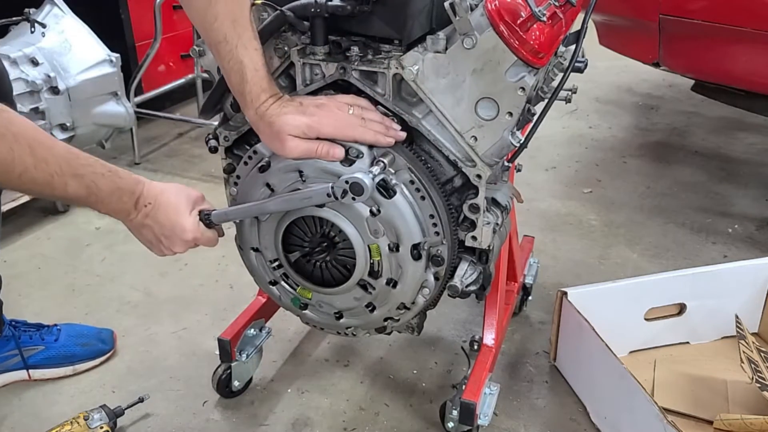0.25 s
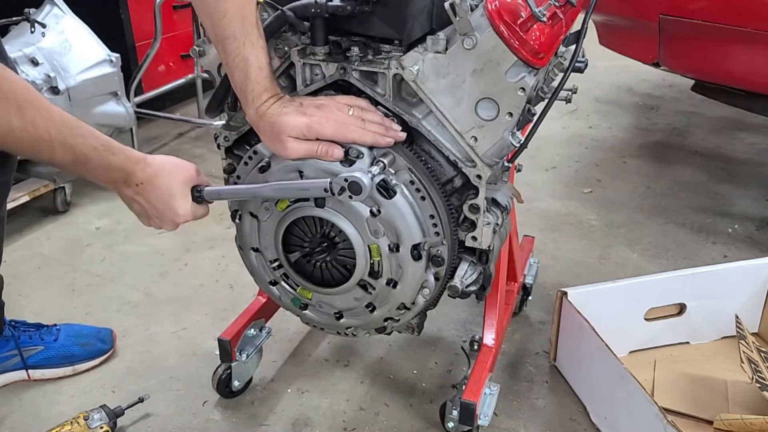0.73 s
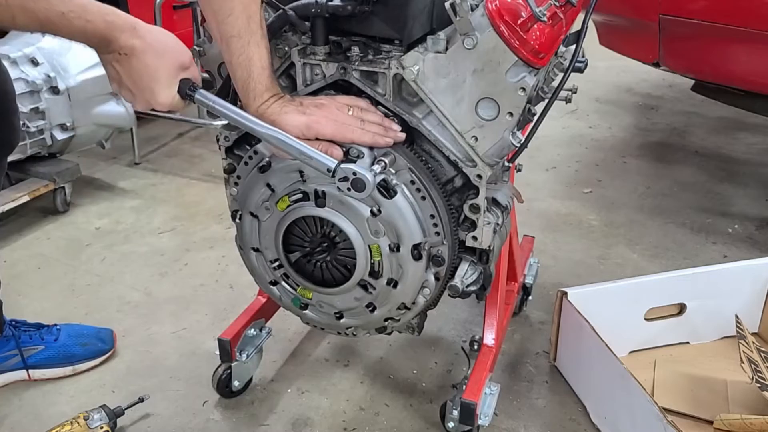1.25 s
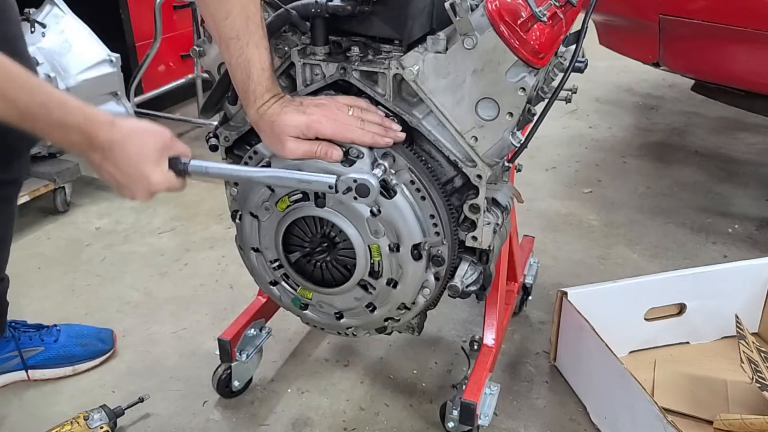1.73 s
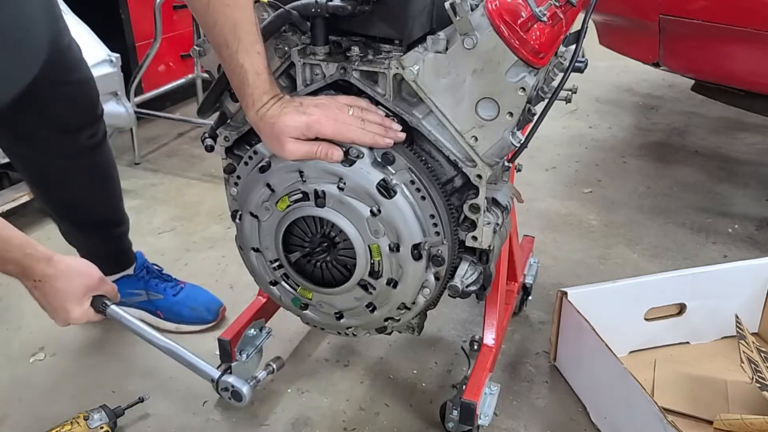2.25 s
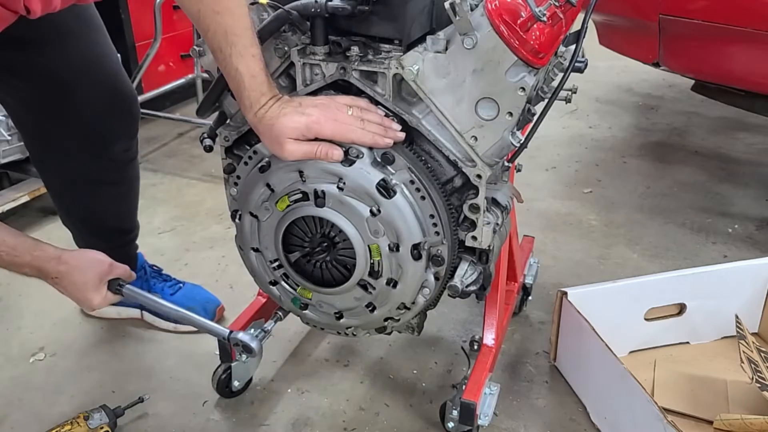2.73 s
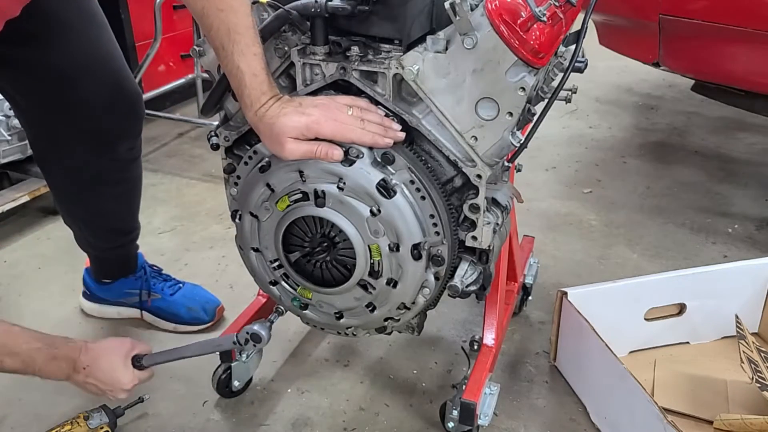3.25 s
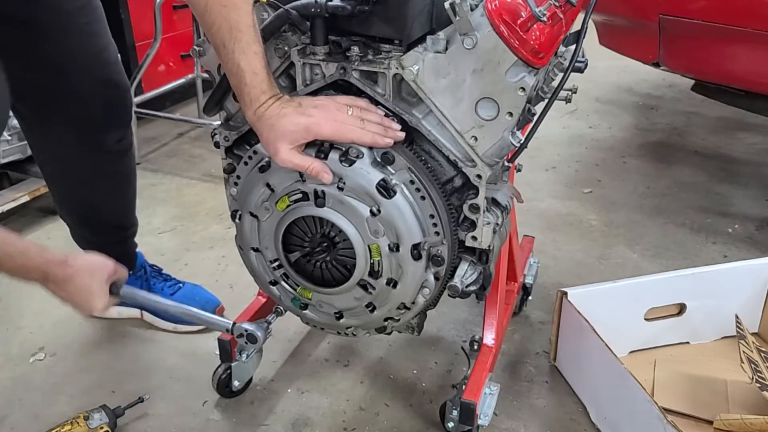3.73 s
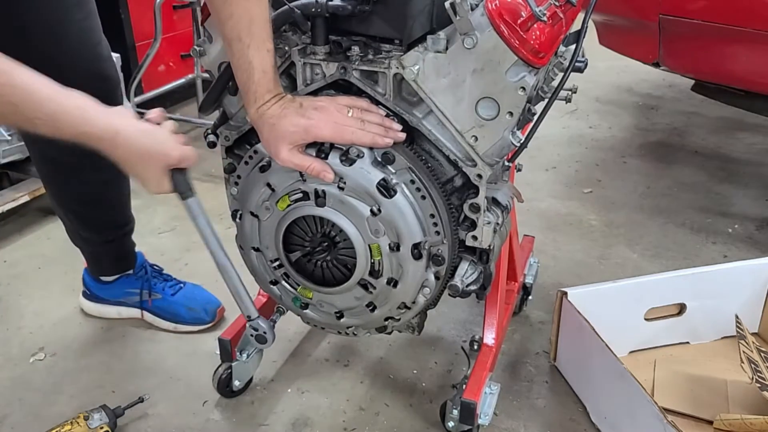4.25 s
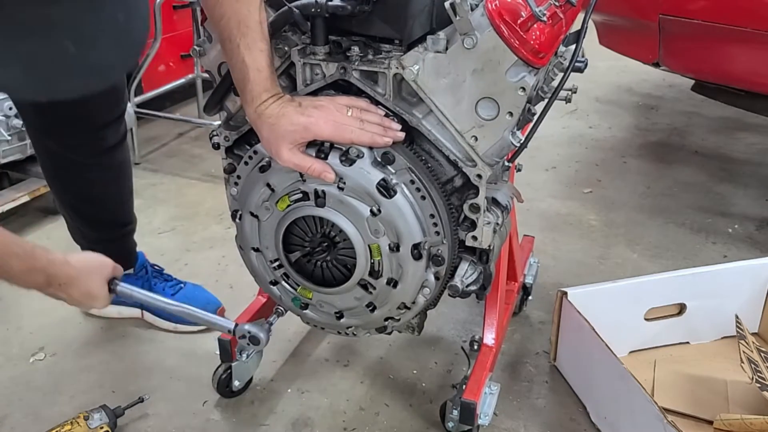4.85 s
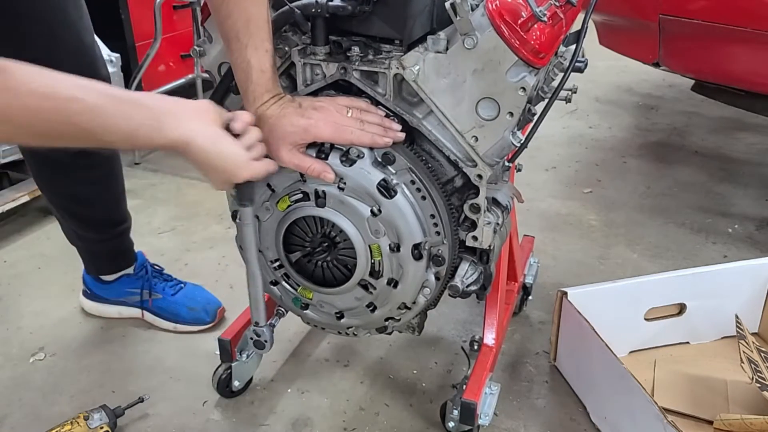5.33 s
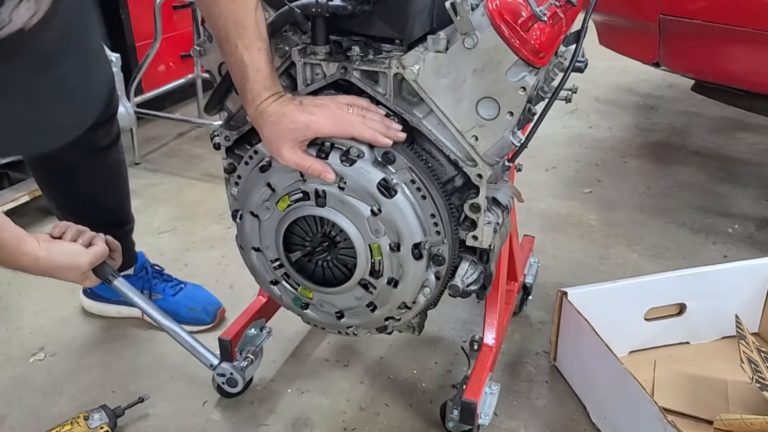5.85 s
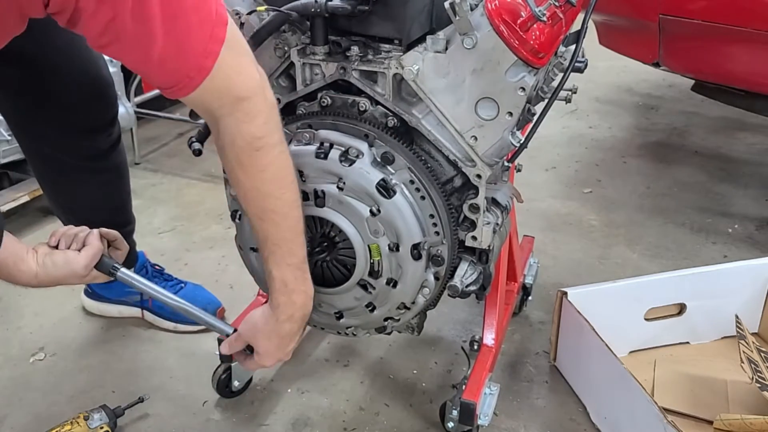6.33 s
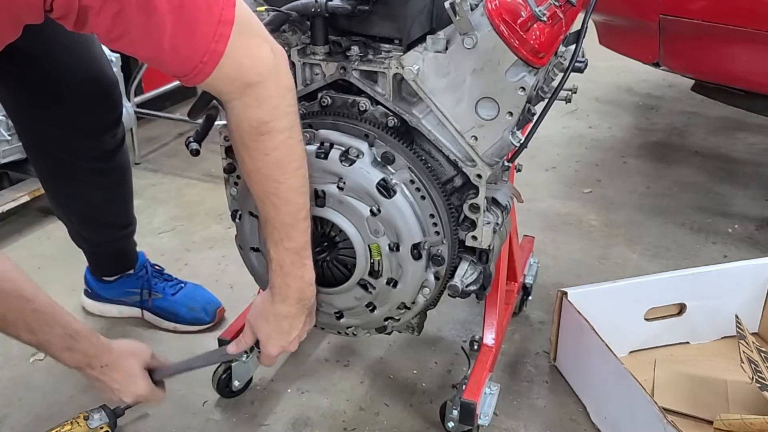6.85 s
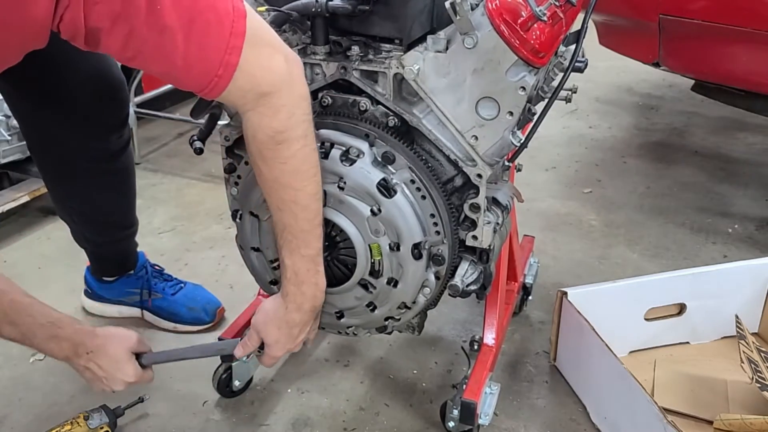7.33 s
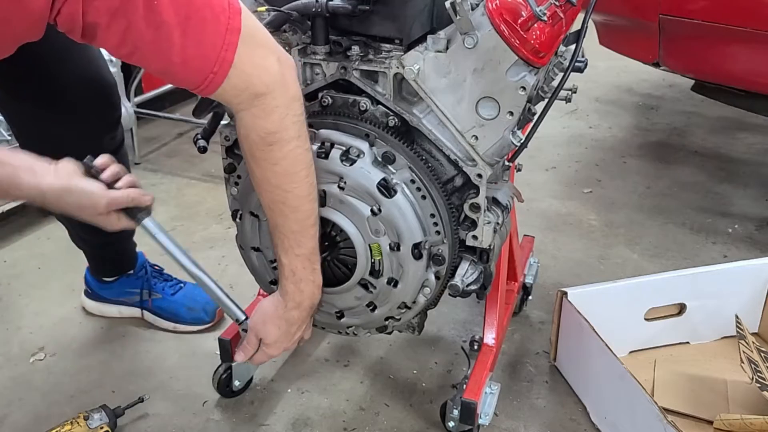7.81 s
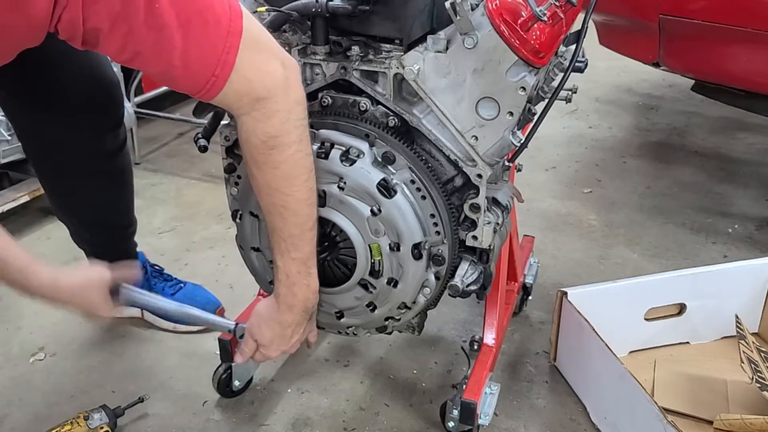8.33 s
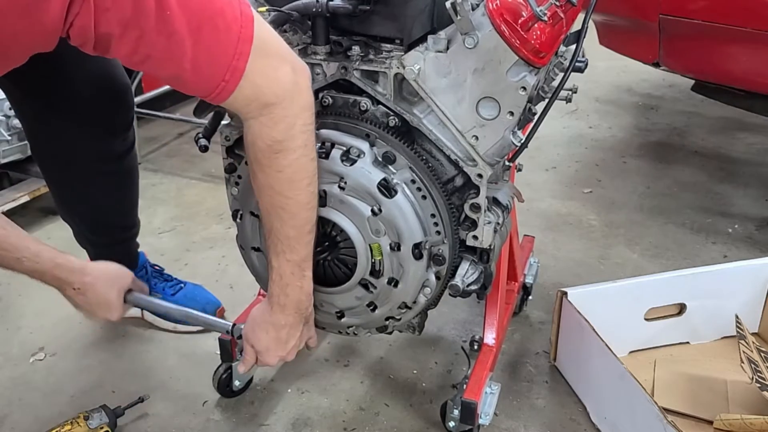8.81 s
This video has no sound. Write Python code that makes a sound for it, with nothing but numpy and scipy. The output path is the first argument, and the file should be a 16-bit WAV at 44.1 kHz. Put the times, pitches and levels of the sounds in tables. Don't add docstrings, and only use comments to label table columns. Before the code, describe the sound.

Close stereo phone pickup of wrench work on an engine stand: isolated hard steel clacks, shoes dragging on gritty concrete, small socket touches, then five brisk pawl ticks. The loudest knocks gather in the middle, three slower ticks follow, and a faster run arrives near the end before faint last taps. The garage adds a short hard echo; sleeves rustle and a distant motor hums quietly.

```python
import sys
import numpy as np
from scipy import signal
from scipy.fft import rfft, irfft
from scipy.io import wavfile

SR = 44100
rng = np.random.default_rng(int(sys.argv[2]) if len(sys.argv) > 2 else 0)


def digitize_waveform(pressure):
    field = np.atleast_2d(pressure).T
    bounded = np.clip(field, -1, 1)
    quanta = np.round(bounded * 32767).astype(np.int16)
    wavfile.write(sys.argv[1], SR, quanta)


def nominal_scale(level):
    x = np.asarray(level, float) / 20
    return 10 ** x


N = 400428
HZ = np.maximum(np.fft.rfftfreq(N, 1 / SR), 1)

# frequency in Hz, density in dB per Hz.
AIR_SPECTRUM = [(20, -13.5), (50, -9), (72, 1), (100, -3.5), (160, -2), (250, -8), (360, -5.5),
                (600, -13.5), (1000, -16), (2700, -20.5), (5000, -34.5), (7400, -31.5), (8000, -53),
                (11000, -39.5), (16000, -49.5)]
# frequency in Hz, correlation from -1 to 1.
AIR_LIKENESS = [(60, 0.96), (180, 1), (550, 0.22), (1650, -0.15), (4970, -0.066), (15000, 0.49)]
# frequency in Hz, rms level in dB, width in Hz, unsteady share from 0 to 1.
MOTOR_TONES = [(119.2, -56.5, 1.6, 0.31), (187, -57, 11, 0.49)]
# time in seconds, level in dB.
RUSTLE_LEVEL = [(0, -62.5), (.35, -74.5), (.63, -61.5), (1.2, -87.5), (1.54, -66.5), (3.5, -66.5),
                (3.7, -77), (3.85, -65), (4.19, -63.5), (4.83, -62), (5.0, -71), (5.26, -68.5),
                (5.42, -75.5), (6.95, -55), (7.24, -73), (8.1, -72.5), (8.7, -64.5), (9.08, -80)]
# peak time in seconds, level in dB, rise in seconds, fall in seconds.
SLEEVE_SWISHES = [
    (.01, -85, 0.045, .15),
    (.29, -73, 0.1, 0.089),
    (3.86, -71, 0.18, 0.53),
    (4.36, -86, 0.12, 0.65),
    (5.26, -79, 0.22, .2),
    (7.24, -77, 0.21, 0.31),
    (8.6, -82, .2, .3),
    (9.05, -84, .2, .2),
]
# start in seconds, peak in dB, bar ring in relative dB.
LIGHT_TOUCHES = [(.0034, -38.5, -4), (0.1095, -36, -12), (2.146, -41, -19), (3.1282, -43, -10.5),
                 (3.1457, -41.5, -7), (3.2464, -39.5, -7), (3.475, -45, -11), (4.2235, -50, -1),
                 (4.261, -45.5, -10), (4.315, -55, -15), (4.7353, -49, 3.5), (4.783, -45, -15),
                 (4.8423, -51.5, -6), (5.132, -47, -19), (5.225, -47, -7), (6.9322, -38.5, -9),
                 (7.0477, -39, -11.5), (7.2377, -36.5, -12), (7.262, -33.5, -23), (7.4085, -37.5, -14.5),
                 (8.7034, -34, -14), (8.7632, -41, -16.5), (9.0417, -35, -25)]
# start in seconds, peak in dB.
SLACK_TAKEUPS = [
    (0.645, -17.5),
    (1.556, -27),
    (2.88, -26),
    (4.357, -46),
    (5.591, -20),
]
# start in seconds, peak in dB, bar ring in relative dB,
# fizz in relative dB, clack centre in Hz.
HARD_KNOCKS = [(0.6508, -5, -26, -16, 3040), (1.5658, -6, -24, -15, 4370),
               (1.7519, -17.5, -28, -21.5, 4600), (2.6996, -29.5, -19, -48, 3290),
               (2.749, -5.5, -25, -27, 2900), (2.886, -11, -17.5, -12, 3210),
               (3.0617, -22.5, -19.5, -25.5, 3710), (3.3273, -23.5, -13, -25, 3140),
               (3.4057, -32.5, -21, -28, 4730), (4.4203, -33, -12.5, -23.5, 3060),
               (4.7016, -35, -9.5, -28, 3070), (5.4357, -35, -36, -20, 4530),
               (5.455, -10.5, -39, -25.5, 3990), (5.474, -16.5, -26, -36, 2860),
               (5.5051, -17, -14.5, -26, 3180), (5.5395, -2.5, -14.5, -30.5, 4200),
               (5.6043, -4, -11, -16.5, 4980), (6.2092, -11.5, -17.5, -30, 2770),
               (6.235, -8.5, -40.5, -29.5, 4120), (6.3023, -11.5, -31, -21, 3580),
               (6.4086, -14, -27.5, -36, 6450), (6.4317, -10.5, -9.5, -18.5, 3150),
               (8.1291, -19.5, -15.5, -28.5, 2345)]
# start in
# seconds, peak in dB, clack centre in Hz.
PAWL_TICKS = [(4.3667, -19.5, 6100), (4.4417, -17, 3530), (4.4926, -16.5, 3120), (4.5425, -19, 5930),
              (4.593, -19.5, 6100), (6.6625, -21, 5750), (6.7196, -19.5, 3360), (6.7784, -19, 4670),
              (8.2571, -18.5, 4270), (8.302, -16.5, 5700), (8.3431, -18.5, 5770), (8.3784, -17.5, 3400),
              (8.4165, -18.5, 6130), (8.4657, -18.5, 2820), (1.274, -59.5, 5450), (1.9814, -44, 7000),
              (7.711, -54.5, 6430), (8.21, -44, 6400), (8.9214, -60.5, 6400)]
# frequency in Hz, level in dB, t60 in seconds.
BAR_MODES = [(1205, -10, .16), (1235, -3, .2), (1258, 0, .17), (1290, -4, .14), (1424, -9, .22),
             (1540, -11, .18), (1690, -10, .11), (2046, -18, .15)]
# frequency in Hz, level in dB, t60 in seconds.
HEAD_MODES = [(2365, -17, .06), (2620, -14, .1), (2770, -10, .06), (2885, -11, .08), (3042, -9, .11),
              (3350, -11, .05), (3570, -14, .04), (4135, -7, .06), (4228, -14, .05), (4610, -14, .04),
              (5260, -15, .06), (6500, -13, .04)]
# frequency in Hz, level in dB, t60 in seconds.
PAWL_MODES = [(2750, -9, .025), (3050, -8, .03), (6450, -9, .02)]
# peak time in seconds, level in dB, rise in seconds, fall in seconds.
SOLE_SCUFFS = [(1.725, -39, .05, 0.076), (1.83, -39, 0.0038, .05), (2.18, -40, 0.0053, 0.059),
               (6.11, -57, 0.0084, 0.025), (1.864, -23, 0.019, 0.043), (1.96, -48.5, 0.1, 0.18),
               (2.084, -44, 0.13, 0.048), (2.205, -32.5, 0.02, 0.042), (2.3, -43, 0.1, 0.063),
               (2.441, -46, 0.084, 0.08), (3.89, -47.5, 0.064, 0.027), (6.016, -46.5, 0.097, 0.05)]
# frequency in Hz, density in dB per Hz.
GRIT_SPECTRUM = [(240, -47.5), (400, -14.5), (575, -7), (828, -10), (950, -9), (1370, -5.5), (3120, -1),
                 (8000, -9), (10400, -107), (17600, -120)]
# frequency in Hz, left minus right in dB.
LEFT_MINUS_RIGHT = [(300, -.5), (1000, -.7), (2500, 3.0), (6000, 2.0), (10000, -1.0), (15000, -3.0)]
# frequency in Hz, lead in radians.
LEFT_LEAD = [(100, 0.044), (1120, 1.08), (2760, 1.44), (5800, 1.31), (16000, 0.33)]
# frequency in Hz, t60 in seconds.
GARAGE_DECAY = [(200, 0.89), (1000, 0.61), (3000, 0.43), (7000, 0.31), (9000, 0.28), (15000, 0.25)]


def at_hz(points, hz):
    table_hz, values = np.transpose(points)
    return np.interp(np.log(hz), np.log(table_hz), values)


def band(x, low_hz, high_hz):
    return signal.sosfilt(signal.butter(2, [low_hz, high_hz], "band", fs=SR, output="sos"), x)


def rms_one(x):
    return x / np.sqrt(np.mean(x ** 2) + 1e-20)


def ring(force, hz, t60_s):
    r, w = nominal_scale(-60 / (t60_s * SR)), 2 * np.pi * hz / SR
    return signal.lfilter([0, np.sin(w)], [1, -2 * r * np.cos(w), r * r], force + 1e-18)


def stereo_noise(gain, alike):
    mid, side = rfft(rng.standard_normal((2, N))) * gain
    alike = np.clip(alike, -1, 1)
    spectrum = np.sqrt(1 + alike) * mid + np.sqrt(1 - alike) * side * [[1], [-1]]
    return irfft(spectrum, N) / np.sqrt(2)


def swells(rows):
    t = np.arange(N) / SR
    total = 0
    for peak_s, db, rise_s, fall_s in rows:
        away = np.where(t < peak_s, (peak_s - t) / rise_s, (t - peak_s) / fall_s)
        total = total + nominal_scale(db - 20 * away)
    return total


def room_tone():
    air = stereo_noise(nominal_scale(at_hz(AIR_SPECTRUM, HZ)), at_hz(AIR_LIKENESS, HZ))
    out = air * nominal_scale(-60.5) / np.std(band(air[0], 215, 2000))
    for hz, db, width_hz, share in MOTOR_TONES:
        wobble = stereo_noise(1 / (1 + ((HZ - hz) / width_hz) ** 2), 0.91)
        steady = np.sqrt(2) * np.sin(2 * np.pi * hz * np.arange(N) / SR)
        out += nominal_scale(db) * ((1 - share) * steady + share * rms_one(wobble))
    return out


def rustle():
    rustle_db = np.interp(np.arange(N) / SR, *np.transpose(RUSTLE_LEVEL))
    noise = stereo_noise(1, 0.87)
    cloth_lumps, grip_lumps = [rms_one(band(rng.standard_normal(N), 3, 30)) for _ in range(2)]
    grip = band(noise, 1170, 1320) + band(noise, 2600, 2900)
    rubbing = rms_one(band(band(noise, 1000, 4600), 670, 5600))
    rubbing += rms_one(grip) * nominal_scale(2.2 * grip_lumps - 9.5)
    swish = swells(SLEEVE_SWISHES) * nominal_scale(3 * grip_lumps - 1)
    swish = swish * rms_one(band(noise, 11000, 16500))
    return nominal_scale(rustle_db - 2.0 + 2 * cloth_lumps) * rubbing + swish


def wrench(contacts, modes, clack_db, bar_db, fizz_db, thud_db, sing_db, loose, ping):
    rows = np.array(contacts)
    start_s, peak_db, bar_rel_db, fizz_rel_db, clack_hz = rows[:, :5].T
    t = np.arange(4000) / SR
    fade = 1000 * t / np.clip(rows[:, 5:], .5, 12)
    blows = rng.standard_normal(fade.shape) * nominal_scale(5.4 * rng.standard_normal(fade.shape))
    blows *= np.exp(-fade) + loose * np.exp(-fade / 7)
    blows *= np.minimum(fade * 4, 1) * (1 - t / t[-1])
    blows /= np.sqrt(np.sum(blows ** 2, axis=1, keepdims=True))
    luck_db = rng.normal(0, 2.5, (len(rows), len(modes) + len(BAR_MODES)))

    def train(db, bursts=blows):
        out = np.zeros(N + len(t))
        for s, burst, gain in zip(start_s, bursts, nominal_scale(peak_db + db)):
            first = round(s * SR)
            out[first:first + len(t)] += gain * burst
        return out[:N]

    rings = np.zeros(N)
    for k, (hz, db, t60_s) in enumerate(modes):
        off_centre_db = -8 * np.abs(np.log2(hz / clack_hz))
        rings += ring(train(-11 + db + luck_db[:, k] + off_centre_db), hz, t60_s)
    bar_push_db = bar_db + bar_rel_db
    for k, (hz, db, t60_s) in enumerate(BAR_MODES):
        rings += ring(train(bar_push_db + db + luck_db[:, -1 - k]), hz, t60_s)
    out = signal.sosfilt(signal.butter(6, 1120, "high", fs=SR, output="sos"), rings)

    clacks = [band(b, hz, hz * 1.25) + ping * ring(b, hz, .045) for b, hz in zip(blows, clack_hz)]
    clack = train(clack_db, clacks)
    clack += band(band(train(clack_db - 1.5), 2200, 6500), 2000, 7900)
    clack += band(train(sing_db + 0.76 * fizz_rel_db), 4400, 8400)
    out += signal.sosfilt(signal.butter(8, 7900, fs=SR, output="sos"), band(clack, 1200, 9000))

    frame = ring(train(bar_push_db - 36 - 0.66 * peak_db), 670, 0.16)
    out += band(frame, 550, 730)
    out += band(train(bar_push_db + 18.5), 170, 410)
    out += band(train(fizz_db + fizz_rel_db, blows * np.exp(-.15 * fade)), 8600, 17000)
    thud = band(train(thud_db + 0.063 * peak_db), 530, 1000)
    return out + band(thud, 330, 1300)


def socket_contacts():
    # fizz in relative dB, clack centre in Hz, chatter in ms; slack first gets its bar ring
    light = [(*row, -34, 3080, 5) for row in LIGHT_TOUCHES]
    slack = [(*row, -25, -19.5, 4000, 6.6) for row in SLACK_TAKEUPS]
    hard = [(*row, 3.6) for row in HARD_KNOCKS]
    return wrench(hard + light + slack, HEAD_MODES, clack_db=19.0, bar_db=-2.0, fizz_db=28.5,
                  thud_db=6.5, sing_db=32.5, loose=0.24, ping=0.008)


def ratchet_ticks():
    bar_rel_db, fizz_rel_db, chatter_ms = -28, -5.5, 6.3
    teeth = [(s, db, bar_rel_db, fizz_rel_db, hz, chatter_ms) for s, db, hz in PAWL_TICKS]
    return wrench(teeth, PAWL_MODES, clack_db=18.5, bar_db=0.0, fizz_db=20.0,
                  thud_db=7, sing_db=24, loose=0.318, ping=0.006)


def scuffs():
    grains = rng.standard_normal(N) * nominal_scale(6.5 * rng.standard_normal(N))
    grit = rms_one(irfft(rfft(grains) * nominal_scale(at_hz(GRIT_SPECTRUM, HZ)), N))
    fizz = rms_one(band(grains, 8000, 17000))
    return nominal_scale(-4.0) * swells(SOLE_SCUFFS) * (grit + nominal_scale(-12.5) * fizz)


def garage(x):
    t = np.arange(SR) / SR
    edges_hz = np.geomspace(150, 18000, num=11)
    white = rng.standard_normal((2, SR))
    tail = 0
    for low, high in zip(edges_hz, edges_hz[1:]):
        t60_s = at_hz(GARAGE_DECAY, np.sqrt(low * high))
        tail = tail + band(white, low, high) * nominal_scale(-60 * t / t60_s)
    tail *= np.clip(t / 0.0047 - .3, 0, 1)
    tail *= 1 + 1.9 * np.exp(-t / 0.0053)
    tail *= nominal_scale(-5) / np.sqrt(np.sum(tail[0] ** 2))
    half = nominal_scale(at_hz(LEFT_MINUS_RIGHT, HZ) / 2) * np.exp(.5j * at_hz(LEFT_LEAD, HZ))
    direct = irfft(rfft(x) * np.array([half, 1 / half]), N)
    return direct + signal.fftconvolve(direct, tail, axes=1)[:, :N]


def scene():
    echoing = socket_contacts() + ratchet_ticks() + scuffs()
    return garage(echoing) + rustle() + room_tone()


def low_pass(x):
    return signal.sosfilt(signal.butter(12, 17140, fs=SR, output="sos"), x)


def record(dry):
    rounded = 0.96 * np.tanh(dry / 0.64)
    top_cut = signal.cheby2(10, 35, 16300, fs=SR, output="sos")
    return low_pass(signal.sosfilt(top_cut, rounded))


dry = scene()
out = record(dry)
digitize_waveform(out)
```